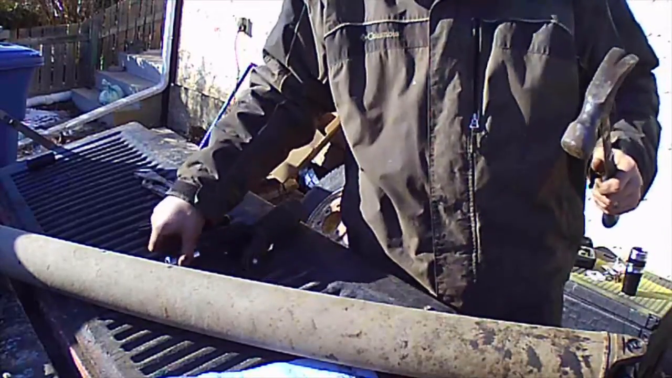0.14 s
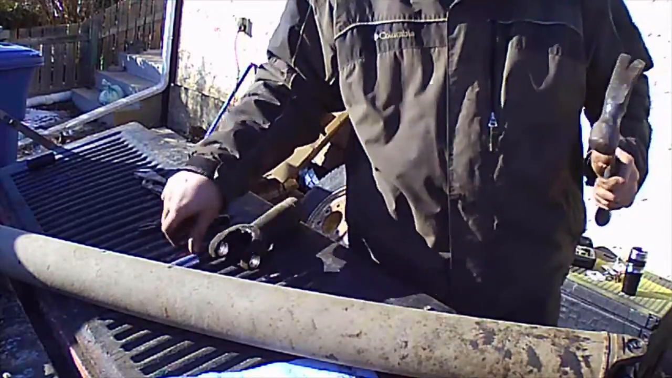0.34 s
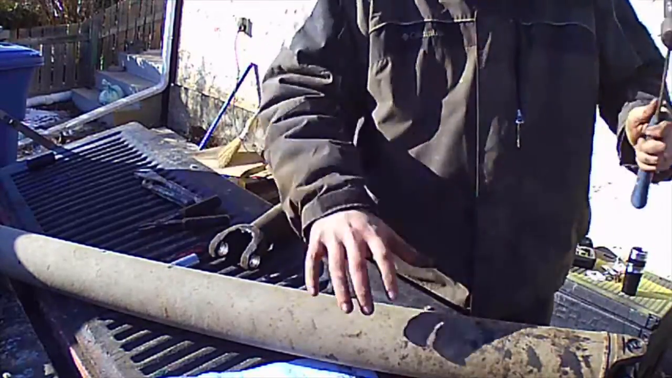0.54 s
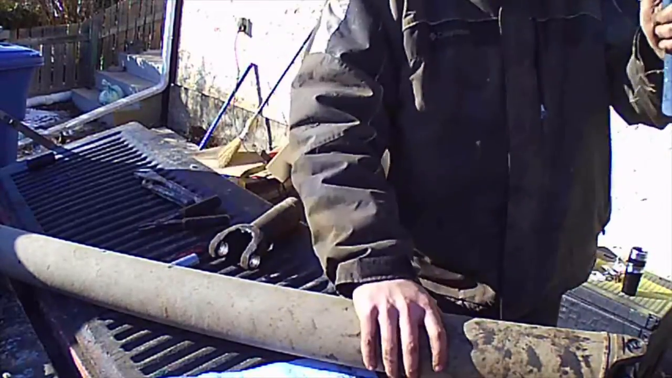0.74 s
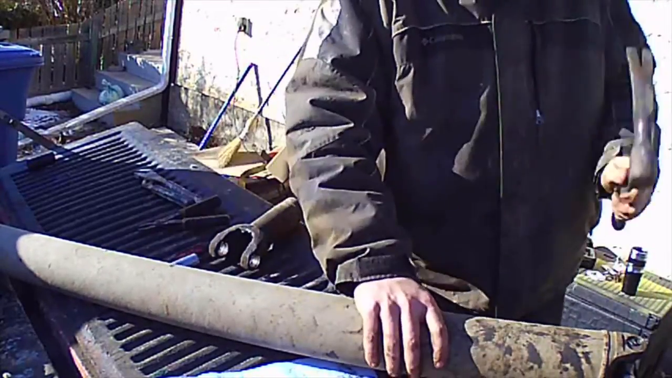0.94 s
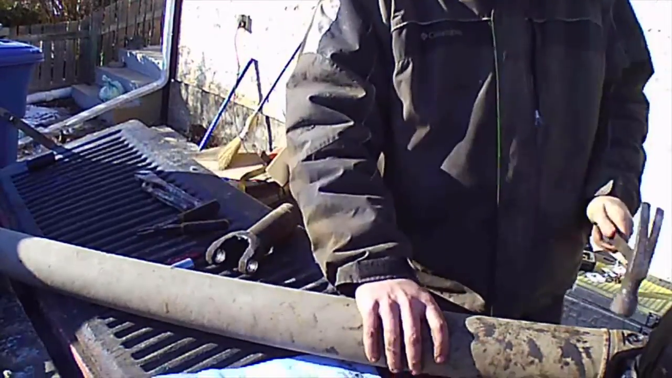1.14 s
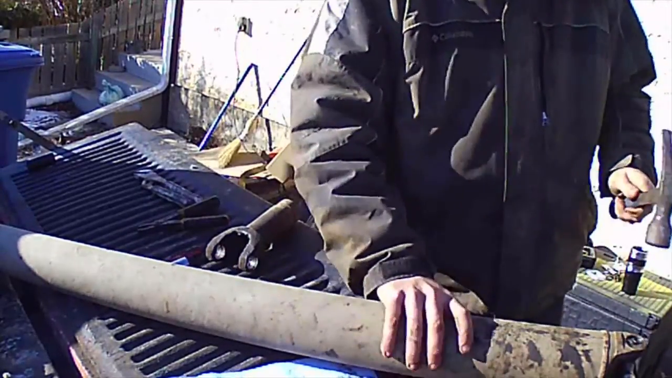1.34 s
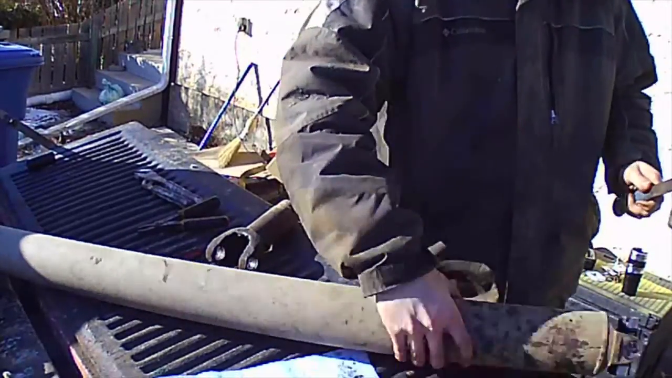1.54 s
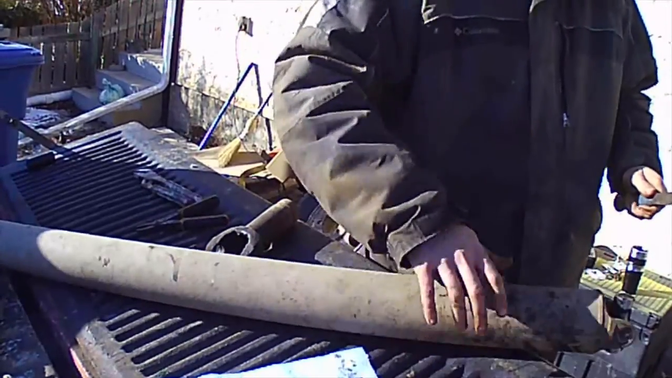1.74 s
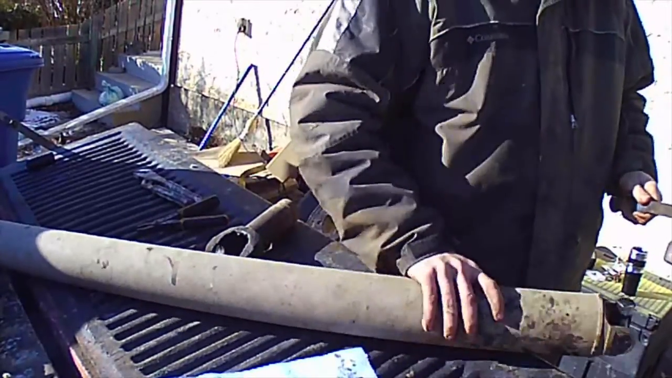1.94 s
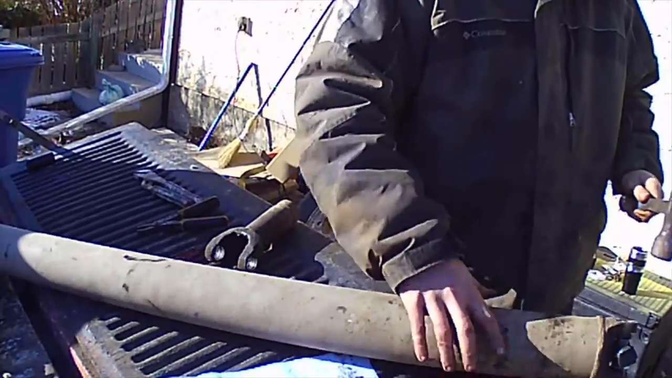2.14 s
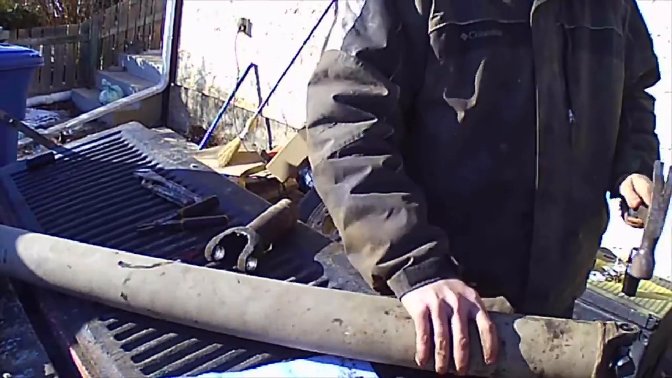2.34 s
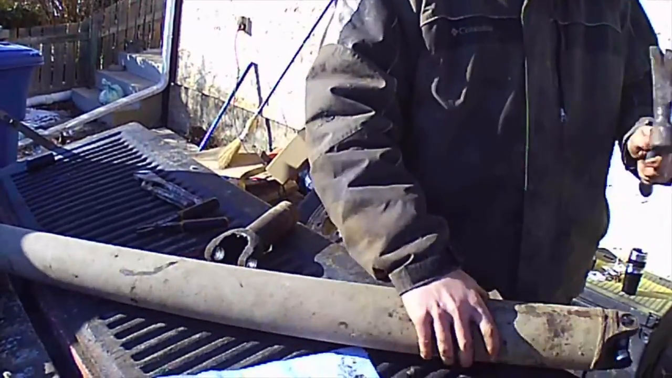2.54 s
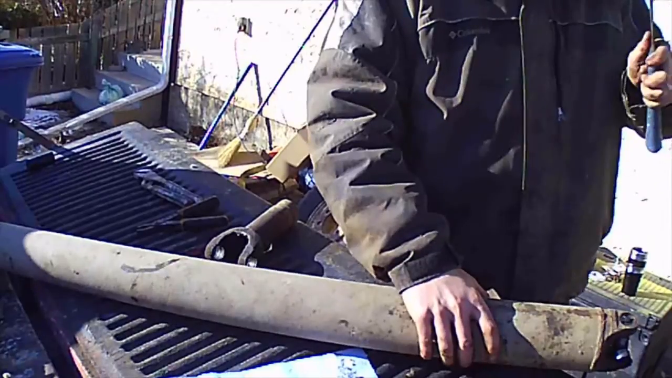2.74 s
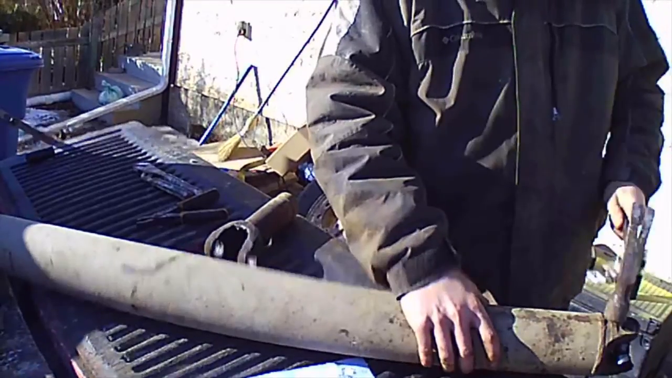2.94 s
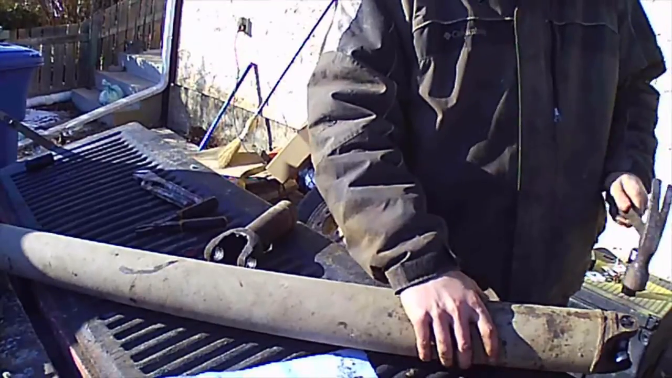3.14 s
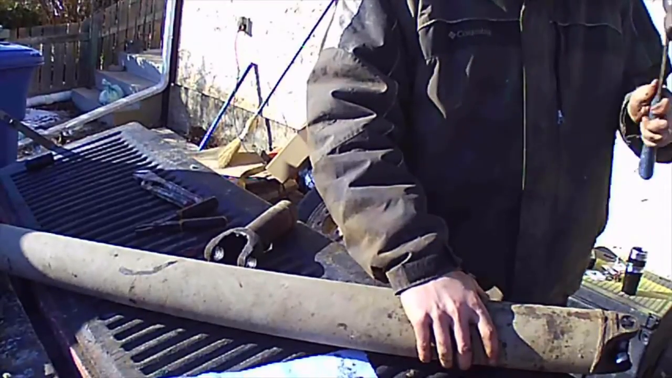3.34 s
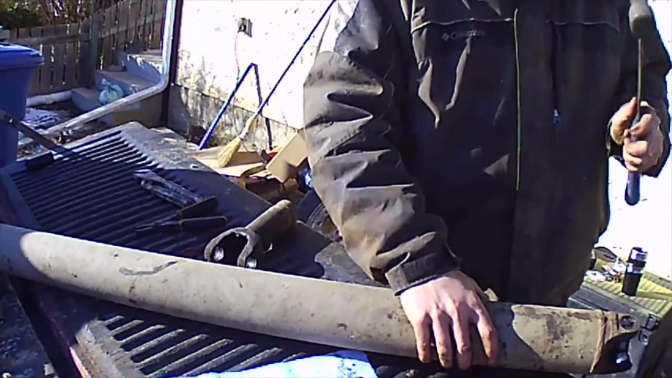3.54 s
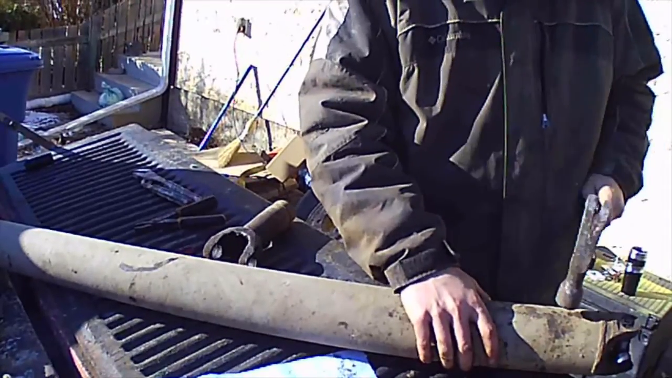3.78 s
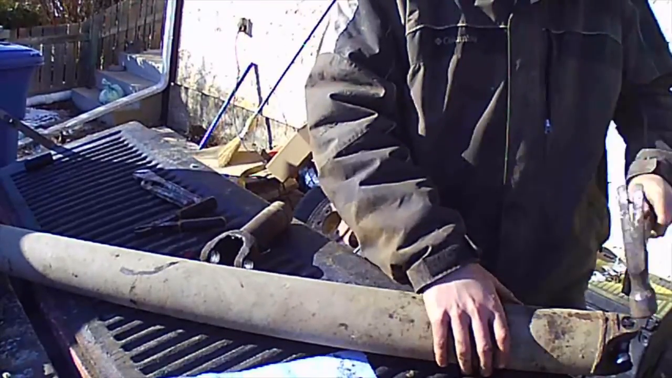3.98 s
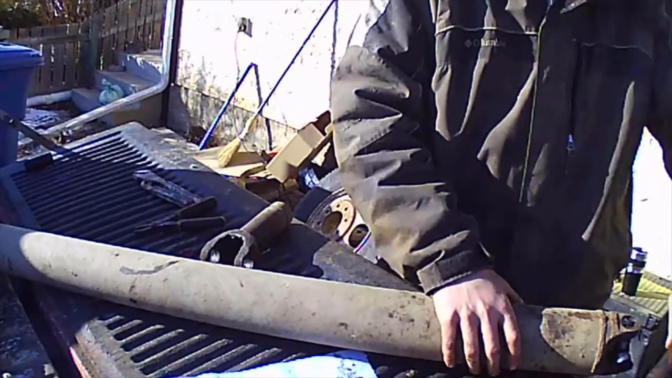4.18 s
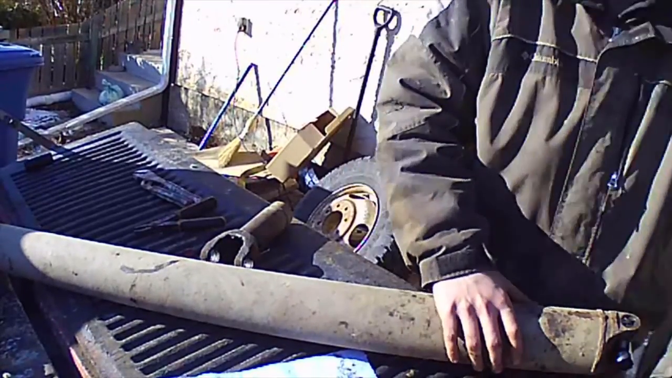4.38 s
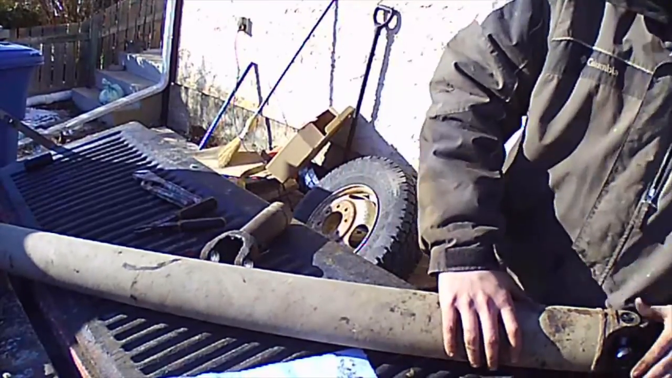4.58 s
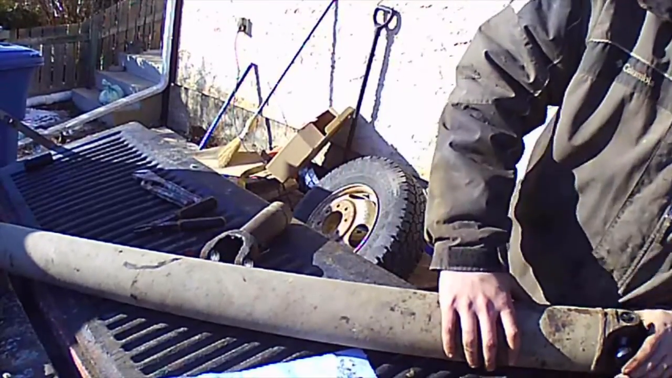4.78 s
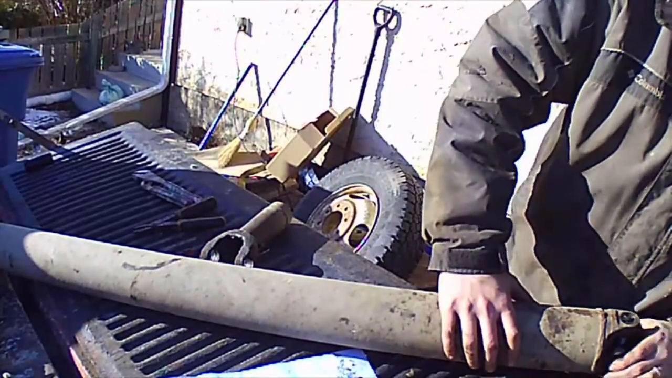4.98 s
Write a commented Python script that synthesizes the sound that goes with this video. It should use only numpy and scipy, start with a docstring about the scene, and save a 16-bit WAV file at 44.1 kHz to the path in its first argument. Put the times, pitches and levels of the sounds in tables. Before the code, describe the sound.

Outdoors on a pickup tailgate, very close microphone. Soft tool taps on a ribbed plastic liner, then a distorted hammer blow on a steel driveshaft joint, ringing and booming. The shaft grinds over grit, knocks hollowly and its loose cap clinks. Two more blows crack close together, then tools are laid down in a small clatter over faint hiss and rumble.

```python
"""Tools tick onto a ribbed liner, then three hammer blows crack on the joint of a steel driveshaft on a pickup's tailgate.
Damped yoke modes ring; decaying noise bands clatter as tube and tailgate; low modes boom as the sprung truck bed.
After the first blow the shaft grinds over grit (wandering noise) and its loose cap clinks (short modes).
More tools are laid down at the end, over dull reflections, hiss and rumble. The close microphone's input clips hard."""
import sys
import numpy as np
from scipy import signal
from scipy.fft import rfft, irfft, next_fast_len
from scipy.io import wavfile

SR = 44100
rng = np.random.default_rng(int(sys.argv[2]) if len(sys.argv) > 2 else 0)


def digitize_waveform(pressure):
    """Quantize a signal to 16-bit integers and store it at the path in sys.argv[1].

    Rows of a 2-D input are taken as channels; values are limited to [-1, 1].
    """
    field = np.atleast_2d(pressure).T
    bounded = np.clip(field, -1, 1)
    quanta = np.round(bounded * 32767).astype(np.int16)
    wavfile.write(sys.argv[1], SR, quanta)


N = 221029
TIME_S = np.arange(N) / SR
BAND_HZ = 30 * 2 ** (np.arange(19) / 2)  # half-octave centres


def undb(db):
    """Amplitude gain of a level in decibels."""
    return 10 ** (np.asarray(db) / 20)


def decay(t_s, t60_s):
    """Exponential loss of 60 dB in t60_s."""
    return np.exp(-np.log(1000) * t_s / t60_s)


def add(track, t_s, sound):
    """Mix a sound into the track at t_s."""
    start = int(t_s * SR)
    track[start:start + len(sound)] += sound[:N - start]


def per_band(table):
    """Columns of a spectrum table, interpolated over log frequency at the band centres."""
    hz, *columns = np.transpose(table)
    return [np.interp(np.log(BAND_HZ), np.log(hz), column)[:, None] for column in columns]


def noise_bands(colour=None):
    """Overlapping half-octave noise bands, each of rms 1, with a body's fine resonances if given."""
    size = next_fast_len(N)
    hz = np.maximum(np.arange(size // 2 + 1), 1) * SR / size
    octaves_off = np.log2(hz / BAND_HZ[:, None])
    shape = np.cos(np.pi * np.clip(octaves_off, -0.5, 0.5))
    response = colour(hz) if colour else 1
    white = rfft(rng.standard_normal(size))
    bands = irfft(shape * response * white, size)[:, :N]
    return bands / bands.std(axis=1, keepdims=True)


def burst(bands, t_s, table, tilt_db_per_oct, size):
    """Modes too many to tell apart: noise bands that each die away at their own rate."""
    level_db, t60_s = per_band(table)
    start = int(t_s * SR)
    grain = bands[:, start:start + size]
    gain = undb(level_db + tilt_db_per_oct * np.log2(BAND_HZ[:, None] / 1000))
    return np.sum(grain * gain * decay(TIME_S[:grain.shape[1]], t60_s), axis=0)


def ring(modes, size):
    """Sum of damped sine modes; neighbours start in opposite directions."""
    t_s = TIME_S[:size]
    total = 0
    for k, (hz, level_db, t60_s) in enumerate(modes):
        total = total + (-1) ** k * undb(level_db) * np.sin(2 * np.pi * hz * t_s) * decay(t_s, t60_s)
    return total


def uneven(modes, spread_db):
    """Each touch lands a little differently and favours other modes."""
    luck = rng.standard_normal(len(modes))
    return [(hz, db + spread_db * dev, t60_s) for (hz, db, t60_s), dev in zip(modes, luck)]


def wobble(count):
    """Random wander, straight lines through count normal points."""
    return np.interp(TIME_S, np.linspace(0, TIME_S[-1], count), rng.standard_normal(count))


def panel_colour(hz, bump_db=4.0, count=500):
    """Clusters among a ribbed panel's countless modes make its response bumpy."""
    bumps = np.interp(hz, np.linspace(0, SR / 2, count), rng.standard_normal(count))
    return undb(bump_db * bumps)


# hammer blows: t/s, ring level/dB, ring time/share of free, contact level/dB,
# landing level/dB, landing tilt/dB per octave, landing boom level/dB
BLOWS = [(1.0107, -3, 1, -6.5, -23, 1.5, -15.5), (2.974, -4, 0.77, 2.5, -31, 4.5, -27),
         (3.6328, 2, 0.81, 3, -23, 3.5, -19.5)]
# instant of contact, also under tools: f/Hz, level/dB per half octave, t60/s
CONTACT = [(85, -27, 0.025), (503, -6, 0.014), (1400, -1, 0.01), (4530, -6.5, 0.049), (8000, -11.5, 0.069),
           (16000, -18.5, 0.037)]
# tube and tailgate modes under a blow: f/Hz, level/dB per half octave, t60/s
CLATTER = [(90, -30.5, 0.11), (151, -24, 0.72), (209.1, -23.5, 0.72), (402, -20.5, .58), (800, -16.5, 0.41),
           (1620, -7, 0.33), (2830, -3.5, 0.19), (4658, -8.5, 0.28), (6860, -11, 0.16), (11000, -9.5, 0.16),
           (16000, -18.5, 0.3)]
CLATTER_DB, CLATTER_TILT_DB_PER_OCT = -1.52, -0.36


def hammer(chatter_db=3):
    """Each blow cracks, wakes yoke modes by where it lands, shakes tube and tailgate; a firm grip damps the ring."""
    crash, steel, bands = np.zeros(N), np.zeros(N), noise_bands(steel_colour)
    for spot, (t_s, ring_db, life, contact_db, *_) in enumerate(BLOWS):
        crack = burst(bands, t_s, CONTACT, 0, size=3000)
        clatter = burst(bands, t_s, CLATTER, CLATTER_TILT_DB_PER_OCT, size=40000)
        add(crash, t_s, undb(contact_db) * crack)
        add(crash, t_s, undb(CLATTER_DB) * clatter)
        add(steel, t_s, undb(ring_db) * ring(yoke(spot, life), size=32000))
    # the loose joint chatters and roughens the ring
    return crash + steel * undb(chatter_db * wobble(count=1200))


# yoke modes: f/Hz
YOKE_HZ = [1077, 1303, 1502, 1640, 1700, 1760, 2044, 2281, 2364, 2482, 2630, 2816, 2955, 3037, 3286, 3475,
           3955, 4199, 4300, 4532, 4795, 5110, 5650, 6240, 6804, 6850, 7209, 7526, 8016, 8400, 8770, 11800]
# same modes, in order: free t60/s, level/dB at striking spots 1, 2, 3
YOKE = [(0.25, -22.5, -22, -20), (1, -24, -43.5, -45.5), (0.056, -28, -16, -11.5), (0.039, -11.5, -3, -16),
        (0.19, -5, -6, -8), (0.19, -6.5, -7, -5.5), (.26, -18, -13, -9), (.35, -3.5, -17, -16.5),
        (0.6, -17, -28, -31), (0.21, -9, -10, -5), (.19, -20, -9, -9), (0.22, -14.5, -11.5, -13.5),
        (0.11, -6.5, -3, -9.5), (.2, -18.5, -18, -8.5), (0.13, -5, -8, -2.5), (0.12, -16.5, -17, -15),
        (.2, -6, -16, -17), (0.18, -13, -9, -0.5), (0.22, -27, -13.5, -13.5), (0.15, -0.5, -6, -5.5),
        (.17, -17.5, -13.5, -12), (.17, -13.5, -12.5, -19), (0.19, -18, -21, -22.5), (0.1, -29, -20, -25.5),
        (.32, -25.5, -28, -29), (0.34, -21.5, -24, -26), (0.2, -18, -19, -10.5), (.13, -30, -17.5, -24),
        (.16, -24, -22, -19), (.18, -24, -18, -20.5), (.19, -26.5, -22.5, -20), (0.13, -27.5, -14, -16.5)]


def yoke(spot, life, split=0.0043, twin_db=-9, twin_life=0.99):
    """Modes heard from one spot; the yoke is not quite round, so each has a weaker twin that beats with it."""
    modes = [(hz, spots[spot], t60_s * life) for hz, (t60_s, *spots) in zip(YOKE_HZ, YOKE)]
    offsets = split * rng.uniform(-0.034, 1, len(modes))
    twins = [(hz * (1 + offset), db + twin_db, t60_s * twin_life)
             for (hz, db, t60_s), offset in zip(modes, offsets)]
    return modes + twins


def steel_colour(hz, peak_db=7, width=0.0074):
    """Rattling against the panel keeps feeding the yoke, so noise gathers around its modes."""
    peaks = sum(np.exp(-((hz / mode_hz - 1) / width) ** 2) for mode_hz in YOKE_HZ)
    return np.sqrt(panel_colour(hz) * (1 + undb(peak_db) ** 2 * peaks))


def landings(hop_s=0.106):
    """Each blow makes the shaft jump and land hop_s later; rows as in KNOCKS."""
    return [(t_s + hop_s, db, tilt_db, boom_db) for t_s, *_, db, tilt_db, boom_db in BLOWS]


# shaft knocking on the tailgate as it settles or is handled:
# t/s, body level/dB, tilt/dB per octave, boom level/dB
KNOCKS = [(0.71, -60.5, 6, -42), (1.196, -31, 1, -19.5), (1.569, -21, -0.5, -21), (1.623, -28, 2.5, -16),
          (1.666, -29, 1.5, -34), (1.705, -34, 0.5, -23), (1.73, -45.5, 5.5, -29.5),
          (1.801, -59, -9.5, -21), (2.079, -39, -4.5, -38.5), (2.135, -51, -4, -21.5),
          (2.437, -42, -4, -23), (2.528, -51.5, -5.5, -19), (3.161, -41.5, 3, -26), (3.872, -33, 1, -28)]
# tailgate under a knock: f/Hz, level/dB per half octave, t60/s
TAILGATE = [(85.3, -26, 0.29), (153.5, -15, 0.44), (351, -5.5, 0.23), (705, -5, 0.26), (1409, -2, 0.18),
            (2550, -10, 0.11), (4830, -17.5, 0.247), (8150, -23, 0.12), (16000, -30.5, 0.077)]


def knocks(spread_db=3, give_s=0.003, ring_db=-18, ring_life=0.55):
    """The shaft sinks into the liner, the tailgate answers hollowly, the damped steel rings a little."""
    out, bands = np.zeros(N), noise_bands(steel_colour)
    # mean over the striking spots; lying on the liner shortens the ring
    steel = [(hz, np.mean(spots), t60_s * ring_life) for hz, (t60_s, *spots) in zip(YOKE_HZ, YOKE)]
    for t_s, body_db, tilt_db, _ in KNOCKS + landings():
        thud = burst(bands, t_s, TAILGATE, tilt_db, size=22000)
        soft_onset = 1 - np.exp(-TIME_S[:len(thud)] / give_s)
        add(out, t_s, undb(body_db) * thud * soft_onset)
        add(out, t_s, undb(body_db + ring_db) * ring(uneven(steel, spread_db), size=11000))
    return out


# truck bed on its springs: f/Hz, level/dB, t60/s
BED = [(45.18, 3, 0.69), (60.6, 0, 0.41), (47.6, -17.5, 5.8), (36, -8.5, 0.76), (140.6, -28.5, 1.4),
       (192, -27.5, 0.29), (213, -24, 1.2)]


def bed(blow_boom_db=-9.5):
    """Every blow and knock pushes the truck bed down; its close modes beat."""
    out, boom = np.zeros(N), -ring(BED, size=80000)
    for t_s, *_ in BLOWS:
        add(out, t_s, undb(blow_boom_db) * boom)
    for t_s, *_, boom_db in KNOCKS + landings():
        add(out, t_s, undb(boom_db) * boom)
    return out


# grit under the tube: f/Hz, level/dB per half octave
GRIT = [(85, -18), (200, 8), (400, 3.5), (1300, -1), (2500, -3), (5000, -7), (9000, -16.5), (16000, -24)]


def rolling(roll_db=-14, catch_db=3):
    """The rusty tube grinds over grit, catching and slipping."""
    grit = np.sum(noise_bands(panel_colour) * undb(per_band(GRIT)[0]), axis=0)
    strength = sum(push(*row) for row in PUSHES)
    return grit * strength * undb(roll_db + catch_db * wobble(count=800))


# pushes that turn the shaft: slide start t/s, tipping t/s, relative slide level/dB just before tipping,
# relative roll level/dB just after, slowing/dB per s
PUSHES = [(1.442, 1.576, -35, -25, 93.5), (1.98, 2.049, -46.5, -41.5, 60.5), (2.385, 2.411, -42, -37, 131)]
SLIDE_ATTACK_S, SLIDE_DB_PER_S = 0.055, 70  # getting going; growth as the hand presses harder
ROLL_ATTACK_S, ROLL_HOLD_S = 0.0091, 0.027  # taking the full weight; full speed, from tipping


def push(start_s, tip_s, slide_db, roll_db, slowing_db_per_s):
    """Grinding strength in one push: a growing slide, then the shaft tips, rolls freely and slows."""
    going = np.clip((TIME_S - start_s) / SLIDE_ATTACK_S, 0, 1)
    slide = going * undb(slide_db - SLIDE_DB_PER_S * np.maximum(tip_s - TIME_S, 0))
    roll = undb(roll_db - slowing_db_per_s * np.maximum(TIME_S - tip_s - ROLL_HOLD_S, 0))
    tipped = np.clip((TIME_S - tip_s) / ROLL_ATTACK_S, 0, 1)
    return slide * (1 - tipped) + roll * tipped


def taps(gap_s=0.037, first_db=-23, growth_db=4.5):
    """The cap chatters while the shaft slides, harder under a strong push; rows as in CLINKS."""
    rows = []
    for start_s, tip_s, _, roll_db, _ in PUSHES:
        for k, t_s in enumerate(np.arange(start_s, tip_s, gap_s)):
            rows.append((t_s, roll_db + first_db + k * growth_db))
    return rows


# single clinks of the loose bearing cap: t/s, level/dB
CLINKS = [(.672, -58), (1.59, -57), (1.729, -28), (1.860, -44), (1.902, -52), (4.636, -53), (4.800, -55)]
# bearing cap and yoke ear modes: f/Hz
CAP_HZ = [2180, 2638, 3047, 3500, 4225, 4310, 4560, 4950, 6750, 7900]
# same modes, in order: level/dB, t60/s
CAP = [(-14, 0.9), (-12, 0.46), (-17, 0.26), (-14.5, 0.1), (-8.5, 0.15), (-5.5, 0.113), (-16, 0.27),
       (-16, 0.16), (-24, 0.26), (-23, 0.1)]


def clinks(spread_db=2):
    """The loose cap taps its yoke as the shaft moves, ringing short steel modes."""
    out = np.zeros(N)
    modes = [(hz, db, t60_s) for hz, (db, t60_s) in zip(CAP_HZ, CAP)]
    for t_s, level_db in CLINKS + taps():
        add(out, t_s, undb(level_db) * ring(uneven(modes, spread_db), size=26000))
    return out


# tools set down on the liner: t/s, level/dB, hardness as tilt/dB per octave
TOOLS = [(0.083, -55, -3), (0.23, -40.5, -1), (.285, -44.5, -2.5), (4.307, -41, 2.5), (4.344, -37.5, -2),
         (4.352, -45.5, 6), (4.413, -42, 1), (4.438, -35.5, 2.5), (4.45, -45, 6), (4.464, -42, 4),
         (4.499, -39.5, -3), (4.568, -40.5, 1), (4.636, -46.5, -1.5), (4.692, -50, -2.5),
         (4.724, -50.5, -5.5)]
# plastic liner under a tool: f/Hz, level/dB per half octave, t60/s
LINER = [(88.6, -21, 0.23), (241.8, -11, 0.23), (366, -1.5, 0.19), (445, -0.5, 0.1), (650, -6, 0.25),
         (1350, 0.5, 0.16), (2350, -18, 0.25), (5000, -13.5, 0.12), (7950, -34.5, 0.15), (16000, -29, .1)]
# panel modes under the liner: f/Hz, level/dB, t60/s
PANEL = [(50, 3, .5), (143, -4.5, 0.98), (302.3, -6, 0.18), (349, -7.5, 0.38), (672, -3, 0.2),
         (810, -7.5, 0.14), (1170, -4, 0.047), (1250, -7.5, 0.23), (1860, 1, 0.034), (2496, -0.5, 0.036)]
TICK_DB, TICK_DB_PER_HARDNESS = -4.5, 3  # relative to the touch
PANEL_DB, PANEL_DB_PER_HARDNESS = -1, 2.36


def tools(spread_db=2, tick_s=0.0037):
    """Contact tick, liner clack and panel hum; a harder touch is brighter, with more tick and hum."""
    out, bands = np.zeros(N), noise_bands(panel_colour)
    for t_s, level_db, hardness in TOOLS:
        tick = burst(bands, t_s, CONTACT, min(hardness, 0), size=2500)
        tick *= np.exp(-TIME_S[:len(tick)] / tick_s)  # a light tool leaves contact sooner
        clack = burst(bands, t_s, LINER, hardness, size=18000)
        hum = ring(uneven(PANEL, spread_db), size=26000)
        add(out, t_s, undb(level_db + TICK_DB + TICK_DB_PER_HARDNESS * hardness) * tick)
        add(out, t_s, undb(level_db) * clack)
        add(out, t_s, undb(level_db + PANEL_DB + PANEL_DB_PER_HARDNESS * hardness) * hum)
    return out


def yard(x, wet_db=-27, t60_s=0.7, dull_hz=1300, delay_s=0.012):
    """Faint, dull reflections from the garage wall and fences: a lowpassed, decaying noise tail."""
    t_s = TIME_S[:SR]
    tail = rng.standard_normal(SR) * decay(t_s, t60_s) * (t_s > delay_s)
    tail /= np.linalg.norm(tail)
    tail = signal.sosfilt(signal.butter(2, dull_hz, fs=SR, output="sos"), tail)
    return undb(wet_db) * signal.fftconvolve(x, tail)[:N]


# background hiss and rumble: f/Hz, level/dB per half octave
FLOOR = [(30, -52), (50, -51.5), (90, -70.5), (250, -73.5), (1000, -75.5), (3000, -74.5), (7000, -72.5),
         (14000, -69.5)]


def background():
    """Microphone hiss over a faint outdoor rumble, as steady noise bands."""
    return np.sum(noise_bands() * undb(per_band(FLOOR)[0]), axis=0)


def scene():
    """All the work on the tailgate, heard from close by."""
    work = hammer() + knocks() + tools() + clinks() + rolling()
    return (work + yard(work) + bed() + background())[None]


def record(dry, offset=0.072, top_hz=15800):
    """The input stage sits off centre and clips hard; a steep lowpass cuts the top."""
    clipped = np.clip(dry + offset, -1, 1) - offset
    lowpass = signal.ellip(10, 0.2, 90, top_hz, fs=SR, output="sos")
    return signal.sosfilt(lowpass, clipped) + offset


dry = scene()
out = record(dry)
digitize_waveform(out)
```